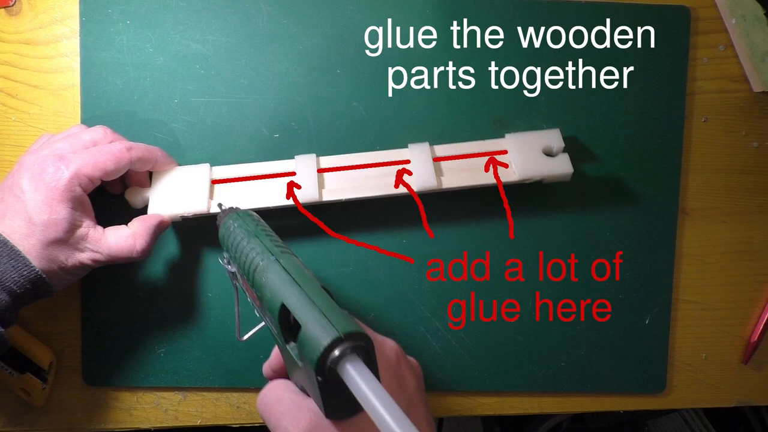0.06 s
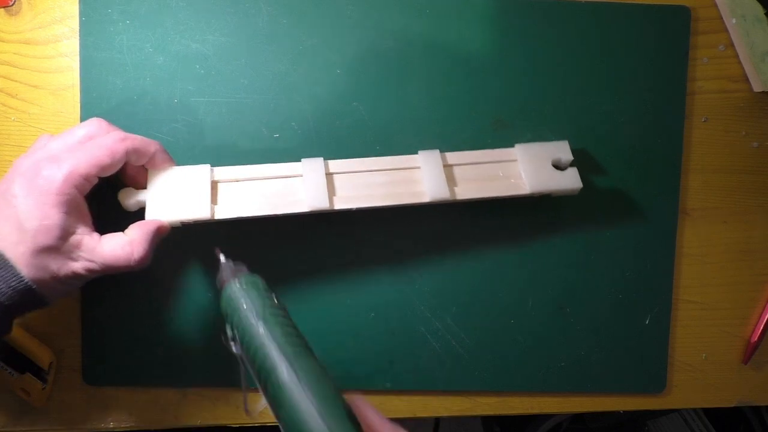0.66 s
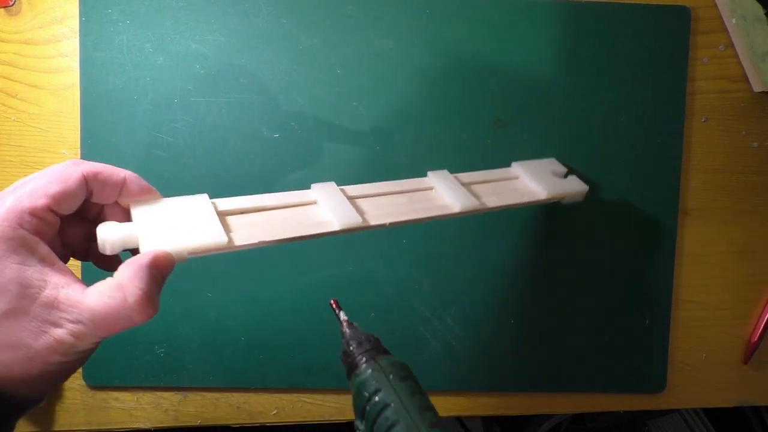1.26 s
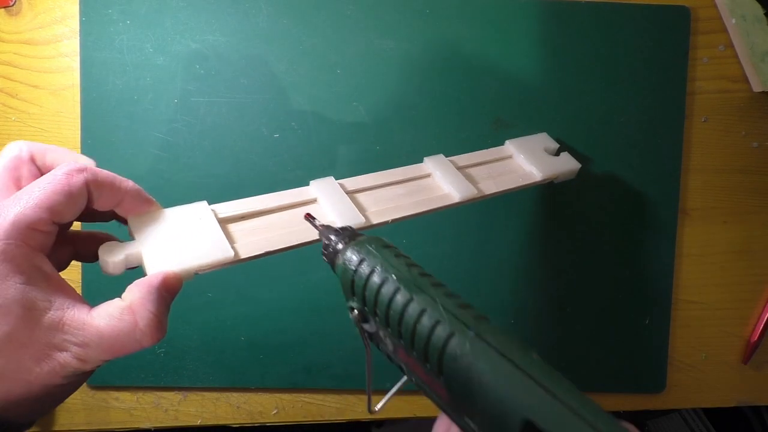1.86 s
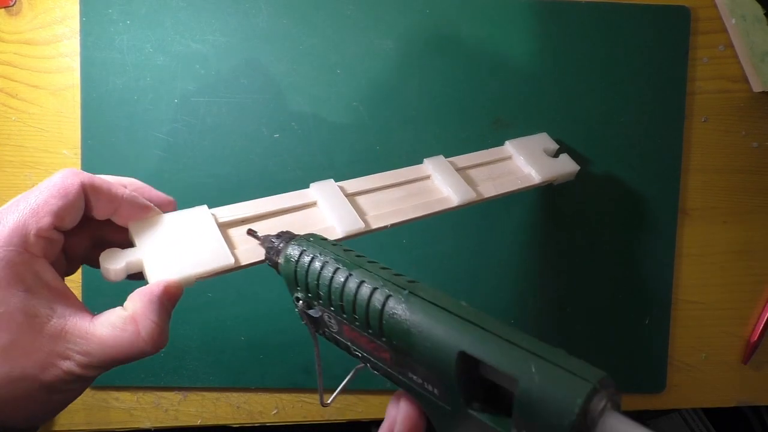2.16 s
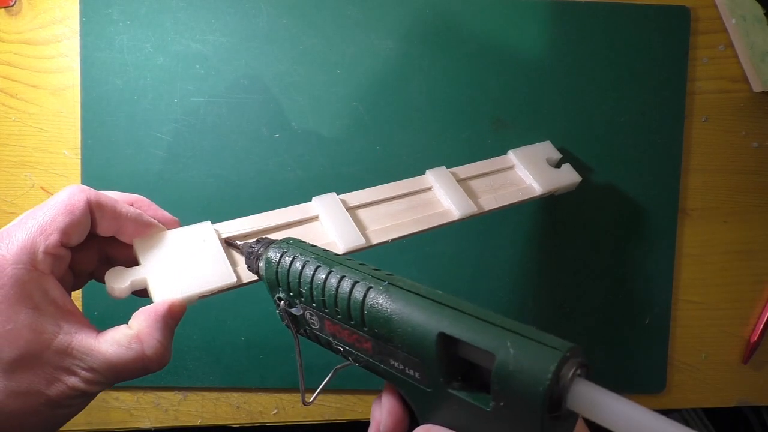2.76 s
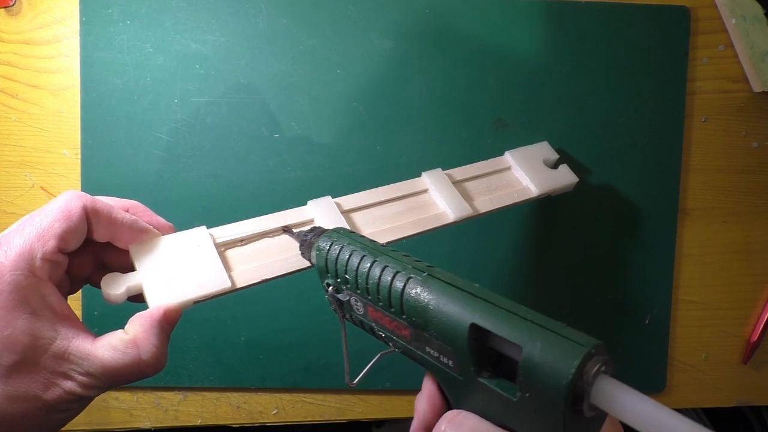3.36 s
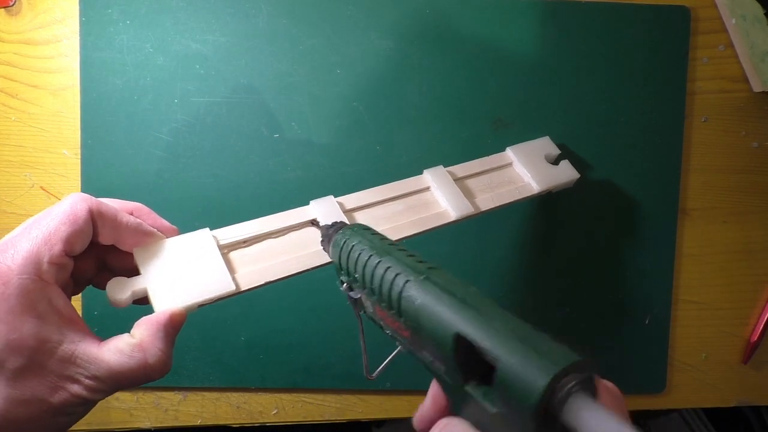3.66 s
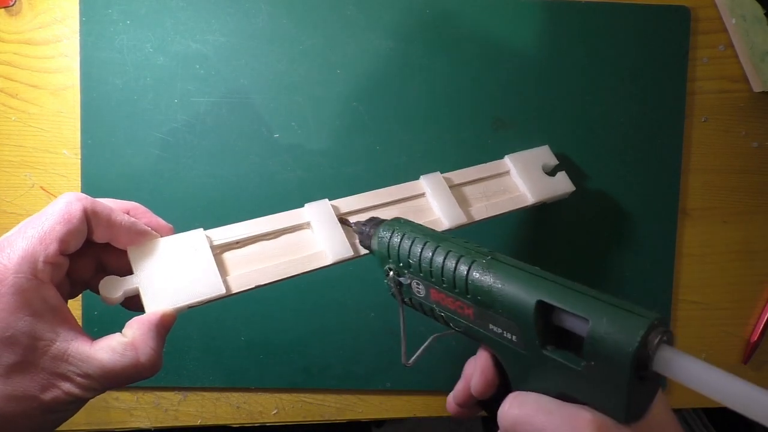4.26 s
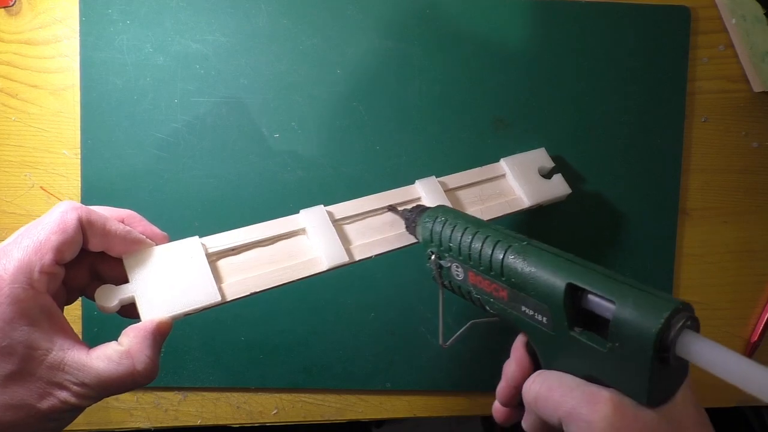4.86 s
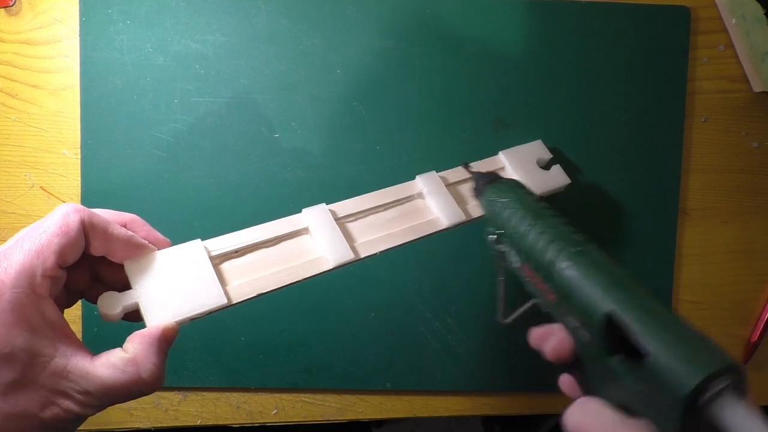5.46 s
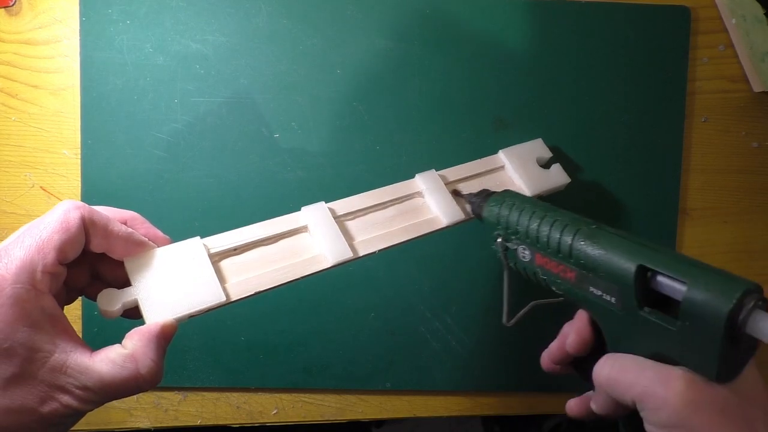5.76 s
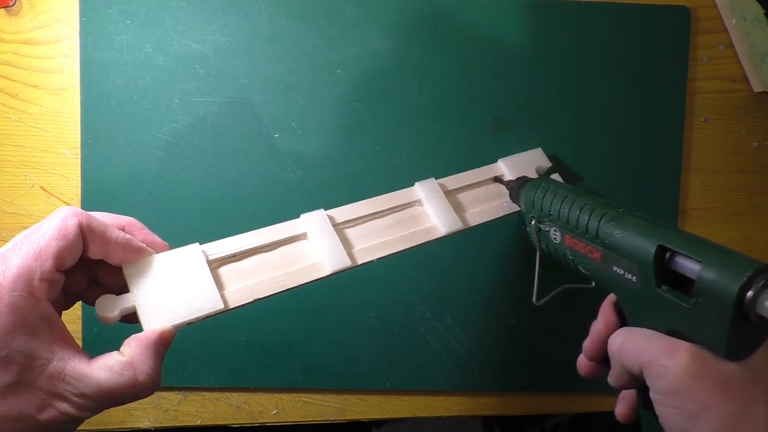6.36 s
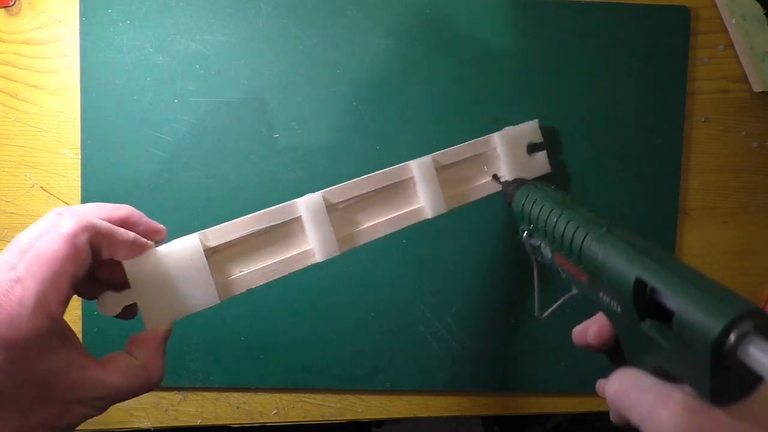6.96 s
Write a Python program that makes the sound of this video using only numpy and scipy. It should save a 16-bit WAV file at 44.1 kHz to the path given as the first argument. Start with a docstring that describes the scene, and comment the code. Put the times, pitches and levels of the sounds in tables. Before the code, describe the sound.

Three runs of creaking plastic ticks and trigger snaps from a glue gun, close up, with light wooden knocks and scrapes.

```python
"""A small room, close up: a hot glue gun lays glue along a light wooden strip on a cutting mat.
On each of three squeezes the feed sticks and slips, ringing the plastic housing in creaking ticks
that grow with finger force. The nozzle hisses along the wood; the trigger snaps back to its stop.
The strip knocks and scuffs on the mat as a hand shifts it, over low room noise."""
import sys
import numpy as np
from scipy import signal
from scipy.fft import rfft, irfft
from scipy.io import wavfile

SR = 44100
rng = np.random.default_rng(int(sys.argv[2]) if len(sys.argv) > 2 else 0)


def output_pcm(signal):
    """Save a mono or channel-first signal as 16-bit PCM at the path in sys.argv[1].

    Samples are clipped to [-1, 1] before scaling.
    """
    pcm = np.clip(np.atleast_2d(signal).T, -1, 1) * 32767
    wavfile.write(sys.argv[1], SR, np.round(pcm).astype(np.int16))


N = 313418
RING = 16384  # impulse response length [samples]
FREQ = np.maximum(np.arange(RING // 2 + 1) * SR / RING, 1)

# trigger lever modes when tuned to LEVER_HZ: (frequency [Hz], width [Hz], gain [dB])
LEVER_MODES = [(438, 85, -14.5), (877, 375, -6.5), (1420, 950, 0.5), (2000, 554, 5), (2543, 370, 2.5),
               (3345, 180, -2), (4050, 1600, -12.5), (7160, 7400, -17), (10340, 760, -13.5)]
LEVER_HZ = 2093


def amp(db):
    """Decibels to gain."""
    return 10 ** (np.asarray(db) / 20)


def unit(x):
    """Scale to rms 1."""
    return x / np.sqrt(np.mean(x ** 2))


def add(out, sound, at_s):
    """Mix a sound into out."""
    i = int(at_s * SR)
    out[..., i:i + sound.shape[-1]] += sound[..., :N - i]


def body(modes, sense=-1):
    """Response of (Hz, width Hz, dB) modes, the k-th times sense**k: negative opposes neighbours."""
    return sum(sense ** k * amp(db) / (1 + 1j * (FREQ ** 2 - hz ** 2) / (FREQ * width_hz))
               for k, (hz, width_hz, db) in enumerate(modes))


def low_cut(hz, order):
    """High-pass response: a small object radiates little bass."""
    return signal.freqs(*signal.butter(order, 1, "high", analog=True), FREQ / hz)[1]


def bending(lag_s):
    """All-pass response: bending waves bring the lows later than the highs."""
    delay_s = .0006 + lag_s / (1 + (FREQ / 1900) ** 4)
    return np.exp(-2j * np.pi * np.cumsum(delay_s) * SR / RING)


def delay(s):
    """Response of a pure delay."""
    return np.exp(-2j * np.pi * FREQ * s)


def blow(response, tilt_db_oct=0):
    """Ring of one blow, tilted brighter for a harder contact; energy of 1 ms at rms 1."""
    octaves = np.log2(np.clip(FREQ, 500, 10000) / 2000)
    ring = irfft(response * amp(tilt_db_oct * octaves))
    ring[RING // 2:] = 0
    return ring / np.sqrt(np.sum(ring ** 2) / (SR / 1000))


def friction(response, slips_per_s):
    """Dense tiny slips of uneven size ring a body; rms 1."""
    slips = (rng.random(N) < slips_per_s / SR) * rng.standard_normal(N)
    return unit(signal.fftconvolve(slips, blow(response))[:N])


def strokes(rows):
    """Envelope following hand speed: quicker rise, slower fall, soft ends."""
    gain = np.zeros(N)
    for at_s, length_s, db in rows:
        speed = np.abs(np.sin(np.pi * np.linspace(0, 1, int(length_s * SR)) ** 0.77))
        add(gain, amp(db) * speed ** 1.49, at_s)
    return gain


def room(early_t60_s, late_t60_s, late_db, correlation):
    """Dense bench reflections, then a weaker wall tail; stereo, unit energy."""
    t = np.arange(RING) / SR
    onset = np.clip(t / .002 - 1, 0, 1)
    fade = onset * (amp(-60 * t / early_t60_s) + amp(late_db - 60 * t / late_t60_s))
    mid, side = rng.standard_normal((2, RING)) / np.sqrt(2)
    noise = np.sqrt(1 + correlation) * mid + np.sqrt(1 - correlation) * np.array([side, -side])
    return noise * fade / np.sqrt(np.sum(fade ** 2))


def heard(dry, reflections, wet_db, pan_db):
    """Direct sound plus reflections; pan is left minus right."""
    wet = signal.fftconvolve(dry[None], reflections, axes=1)[:, :len(dry)]
    return (dry + amp(wet_db) * wet) * amp(np.array([[pan_db], [-pan_db]]) / 2)


def air():
    """Steady low room noise, unlike at the two ears, under an even hiss."""
    # noise spectrum: (frequency [Hz], relative density [dB])
    spectrum = [(15, -53), (25, -10), (175, -3.5), (363, -11.5), (405, -9.5), (624, -23.5), (714, -16.5),
                (1070, -20.5), (1610, -17), (1840, -20.5), (3080, -20), (3520, -26), (7310, -33),
                (11000, -26), (16000, -27.5)]
    hz, db = np.transpose(spectrum)
    log_freq = np.log(np.maximum(np.arange(N // 2 + 1) * SR / N, 1))
    colour = amp(np.interp(log_freq, np.log(hz), db))
    side_db = np.interp(log_freq, np.log([80, 250, 1000, 10000]), [-2.0, 0.5, 8.5, -12.5])
    mid, side = irfft(rfft(rng.standard_normal((2, N))) * [colour, colour * amp(side_db)], N)
    return amp(-58.5) * np.array([mid + side, mid - side]) / np.std(mid)


def nozzle():
    """The metal tip hisses faintly along the wet bead, wavering with hand pressure."""
    # glue beads: (start [s], length [s], level [dB])
    beads = [(2.774, 0.91, -62.5), (4.46, 0.7, -61.5), (6.029, 0.34, -62.5)]
    # hiss resonances: (frequency [Hz], width [Hz], gain [dB])
    modes = [(1276, 620, -9.5), (2074, 170, 2.5), (2950, 570, -4.5), (4130, 600, -2.5), (5320, 310, -0.5),
             (6500, 1300, -7.5), (9640, 500, -6.5), (10750, 1100, -13.5)]
    fade_s, waver_db, waver_per_s = 0.02, 3.5, 8.2
    t = np.arange(N) / SR
    drawn = sum(amp(db) * np.clip(np.minimum(t - at_s, at_s + length_s - t) / fade_s, 0, 1)
                for at_s, length_s, db in beads)
    pressure = amp(waver_db * np.interp(t * waver_per_s, np.arange(RING), rng.standard_normal(RING)))
    dry = drawn * pressure * friction(body(modes), slips_per_s=7900)
    reflections = room(early_t60_s=0.0176, late_t60_s=0.22, late_db=-29.5, correlation=0.85)
    return heard(dry, reflections, wet_db=-7, pan_db=0)


def strip():
    """Knocks and scuffs ring the same wooden modes; the mat adds a dry rasp to the scuffs."""
    # wooden strip: (frequency [Hz], width [Hz], gain [dB])
    modes = [(247.6, 43.6, 4), (379, 11, -7.5), (727, 17.6, -3), (860, 17, -31), (1048, 27.7, 7.5),
             (1266, 94, 10.5), (1277, 155, 6.5), (1523, 180, -1.5), (1480, 370, -2), (1880, 490, -10.5),
             (2206, 190, -11), (2810, 180, -15), (2970, 72, -13.5), (4220, 1700, -42), (4720, 330, -23),
             (5550, 210, -21), (6900, 67, -38), (8220, 4000, -33)]
    # slides on the mat: (start [s], length [s], level [dB])
    scuffs = [(0.405, 0.095, -41), (0.61, 0.21, -44.5), (0.78, 0.052, -47.5), (1.265, 0.13, -37.5),
              (1.425, 0.073, -51.5), (1.775, 0.068, -47.5), (2.21, 0.17, -51), (3.125, 0.086, -60),
              (3.49, 0.052, -58.5), (3.62, 0.076, -53), (3.975, 0.15, -49), (5.19, 0.12, -55.5),
              (6.77, 0.13, -43), (6.87, 0.075, -47), (6.99, 0.055, -45)]
    # knocks on the mat: (time [s], relative level [dB], tilt [dB/octave])
    knocks = [(1.2403, -6.5, -1), (6.782, -7.5, 0.5), (6.9583, -25.5, -0.5)]
    wood = friction(body(modes) * low_cut(hz=270, order=2), slips_per_s=3500)
    rasp = friction(body([(2100, 2400, 0)]) ** 2, slips_per_s=2900)
    dry = strokes(scuffs) * (wood + amp(-11) * rasp)
    # struck in one spot, all modes start together
    struck = body(modes, sense=0.89) * low_cut(hz=235, order=2) / (1 + 1j * FREQ / 3000)
    for at_s, db, tilt_db_oct in knocks:
        add(dry, amp(db - 6) * blow(struck, tilt_db_oct), at_s)
    # the gun bumps the work once
    bump = body([(250, 24, 3.5), (460, 57, -1.5)]) * low_cut(hz=175, order=2)
    add(dry, amp(-32) * blow(bump), at_s=4.2395)
    reflections = room(early_t60_s=0.027, late_t60_s=0.42, late_db=-23.5, correlation=0.76)
    return heard(dry, reflections, wet_db=-2, pan_db=-0.6)


def lever(hz):
    """Response of the trigger lever, tuned by where it is struck."""
    modes = [(mode_hz * hz / LEVER_HZ, width_hz, db) for mode_hz, width_hz, db in LEVER_MODES]
    return body(modes) * low_cut(hz=499, order=2) * bending(lag_s=0.00095)


def snap(hz, seat_s, spring_db):
    """The lever touches its stop, then seats, heavier and duller; the return spring shivers on."""
    t = np.arange(RING) / SR
    touch_db, spring_decay_s = -10, 0.043
    contacts = amp(touch_db) + delay(seat_s) / (1 + (FREQ / 5000) ** 4)
    shiver = irfft(rfft(rng.standard_normal(RING)) * body([(2600, 1050, 0)]) ** 2)
    spring = amp(spring_db) * unit(shiver) * np.exp(-t / spring_decay_s)
    return blow(lever(hz) * contacts, tilt_db_oct=1.5) + spring


def trigger():
    """The loose lever clicks and rubs; let go, it speeds along its guide and snaps on the stop."""
    # snaps: (time [s], relative level [dB], tuning [Hz], seating [s], rub [dB], spring re snap [dB])
    releases = [(3.7702, -6.5, 2133, 0.0014, -39.5, -42), (5.3278, -4.5, 2175, 0.0014, -34, -34),
                (6.6921, -4, 2200, 0.000807, -30.5, -24)]
    # loose clicks: (time [s], relative level [dB], tilt [dB/octave])
    clicks = [(3.5961, -38, -12), (3.7012, -29, 10.5), (3.7443, -24.5, 0), (3.974, -31.5, 0),
              (5.0894, -32, -10.5), (5.264, -31, 13), (5.31, -27, 0.5), (5.5299, -33, 1),
              (6.5688, -29, -2.5), (6.6207, -29, 8.5), (6.631, -34, -1), (6.6547, -48, -5),
              (6.9908, -32, 3.5), (7.0386, -44, -4), (7.066, -33.5, -2)]
    # shifts in the guide as the finger eases: (start [s], length [s], level [dB])
    rubs = [(3.62, 0.062, -62), (5.2, 0.084, -51.5), (6.535, 0.11, -49.5)]
    swell_db_per_s, lead_s = 682, 0.0005
    t = np.arange(N) / SR
    rub_gain, hits = strokes(rubs), np.zeros(N)
    for at_s, db, hz, seat_s, rub_db, spring_db in releases:
        rub_gain += amp(rub_db - swell_db_per_s * np.abs(at_s - t)) * (t < at_s)
        add(hits, amp(db - 0.5) * snap(hz, seat_s, spring_db), at_s - lead_s)
    for at_s, db, tilt_db_oct in clicks:
        add(hits, amp(db - 4) * blow(lever(LEVER_HZ), tilt_db_oct), at_s - lead_s)
    rub = rub_gain * friction(body(LEVER_MODES) * low_cut(hz=896, order=2), slips_per_s=2400)
    reflections = room(early_t60_s=0.021, late_t60_s=0.29, late_db=-18, correlation=0.42)
    return heard(hits + rub, reflections, wet_db=-7.5, pan_db=-1.1)


def stick_slip():
    """Yield each slip: force builds and levels off, and a longer wait stores more of it."""
    # glue stick slips, one list a squeeze: (time [s])
    slips = [
        [1.854, 1.949, 2.058, 2.185, 2.306, 2.36, 2.422, 2.52, 2.628, 2.701, 2.79, 2.987],
        [4.132, 4.148, 4.165, 4.191, 4.215, 4.23, 4.253, 4.284, 4.308, 4.338, 4.371, 4.387, 4.42, 4.479, 4.531],
        [5.642, 5.669, 5.693, 5.728, 5.75, 5.771, 5.791, 5.822, 5.873, 5.907, 5.936, 5.963, 6.001, 6.07, 6.199],
    ]
    # squeezes: (first relative level [dB], full relative level [dB], build-up [s],
    # first tilt [dB/octave], reflections [dB], left minus right [dB])
    squeezes = [(-19, -5.5, 0.89, 0.5, -8, -1.6), (-32.5, -8.5, 0.13, -3.5, -5.5, -1),
                (-39, -10, 0.16, -0.5, -4.5, -3)]
    usual_wait_s, full_tilt_db_oct = 0.056, 0.63
    for times, (first_db, full_db, build_s, first_tilt_db_oct, wet_db, pan_db) in zip(slips, squeezes):
        waits = np.diff(times)
        for at_s, wait_s in zip(times, np.r_[waits[0], waits]):
            slack = np.exp(-(at_s - times[0]) / build_s)
            wait_db = np.log2(wait_s / usual_wait_s)  # 1 dB per doubling
            db = full_db + slack * (first_db - full_db) + wait_db
            tilt_db_oct = full_tilt_db_oct + slack * (first_tilt_db_oct - full_tilt_db_oct)
            yield at_s, db, tilt_db_oct, wet_db, pan_db


def feed():
    """Each slip of the glue stick rings the housing; a tick ends lower than it starts."""
    # plastic housing: (frequency [Hz], width [Hz], gain at each of the three grip_s [dB])
    housing = [(1046, 184, -5.5, -4, 4.5), (1305, 166, 5, 11, 2), (1627, 230, -17, 8, 2),
               (2030, 180, 8.5, 6, 9.5), (2690, 395, -7, 2.5, 2), (2980, 300, 10, 12, 4),
               (3293, 165, 9.5, 8, 14), (3720, 127, 5.5, 13, 9), (3900, 104, 5.5, -1, 10.5),
               (3960, 460, 1, 13.5, 6.5), (4540, 110, -25, -14, 6), (4360, 120, -4, 10, 2),
               (5200, 24, -27, -6, -8), (6080, 130, -26, -30, -6), (6570, 68, -5, 19, 15),
               (9420, 280, 11, 23.5, 3), (10470, 870, 20.5, 6, 24.5), (11900, 900, -20, -19, -10)]
    # moments between which the mode gains glide: (time [s])
    grip_s = [2.13, 2.8, 5.04]
    out = np.zeros((2, N))
    t = np.arange(RING) / SR
    hz, width_hz, *grip_db = np.transpose(housing)
    mat_echo = amp(-4) * body([(4460, 560, 0)]) * delay(0.0023)
    path = bending(lag_s=0.0019) * (1 + mat_echo) * low_cut(hz=928, order=6)
    # dense, short ring above the distinct modes
    shell = rfft(rng.standard_normal(RING) * np.exp(-t / 0.0048)) * low_cut(hz=5200, order=3)
    shell = shell / np.std(shell) / (1 + 1j * FREQ / 11000)
    plastic_damping = signal.freqs(*signal.butter(3, 1, analog=True), FREQ / 5900)[1]
    for at_s, db, tilt_db_oct, wet_db, pan_db in stick_slip():
        pitch_jitter, gain_jitter = rng.standard_normal((2, len(hz)))
        mode_db = np.array([np.interp(at_s, grip_s, row) for row in np.transpose(grip_db)])
        modes = zip(hz * (1 + .007 * pitch_jitter), width_hz, mode_db + 1.5 * gain_jitter)
        shell_db = np.interp(at_s, grip_s, [-14, -5, -4])
        ring = body(modes, sense=0.93) * plastic_damping + amp(shell_db) * shell
        # a gentle slip lets go slowly and is dull
        cutoff_hz = 14000 * amp(0.55 * (db + 6.5))
        tick = blow(ring * path / (1 + 1j * FREQ / cutoff_hz) ** 2, tilt_db_oct)
        # each tick has its own short, randomly drawn room tail
        reflections = room(early_t60_s=0.028, late_t60_s=0.18, late_db=-9, correlation=0.5)
        add(out, amp(db - 4.5) * heard(tick, reflections, wet_db, pan_db), at_s)
    return out


def scene():
    """Gun, strip and room noise, in stereo."""
    return feed() + trigger() + strip() + nozzle() + air()


def record(dry):
    """Opening silence, soft clipping, low-pass."""
    start_s, top_hz = 0.432, 16000
    gate = np.arange(N) / SR >= start_s
    rounded = np.tanh(0.61 * dry * gate) / 0.59
    return signal.sosfilt(signal.ellip(8, .2, 70, top_hz, fs=SR, output="sos"), rounded)


dry = scene()
out = record(dry)
output_pcm(out)
```